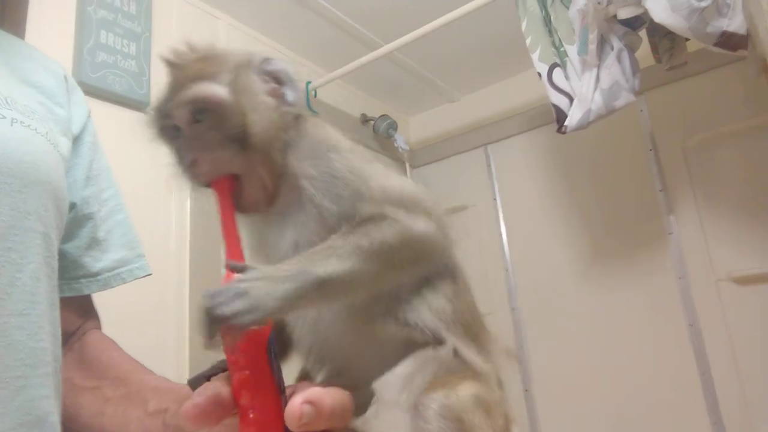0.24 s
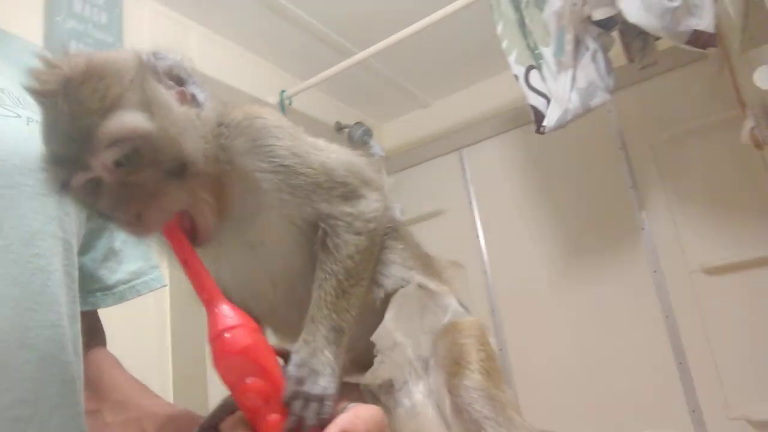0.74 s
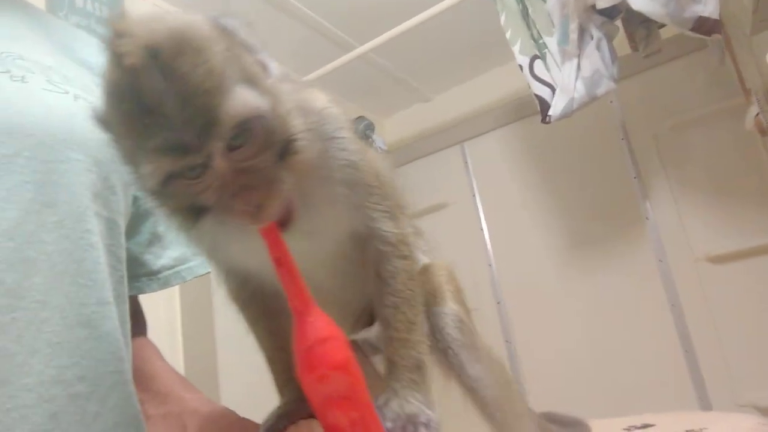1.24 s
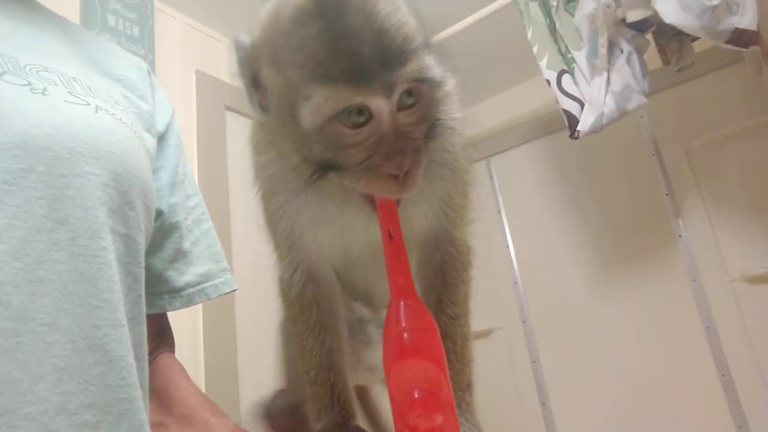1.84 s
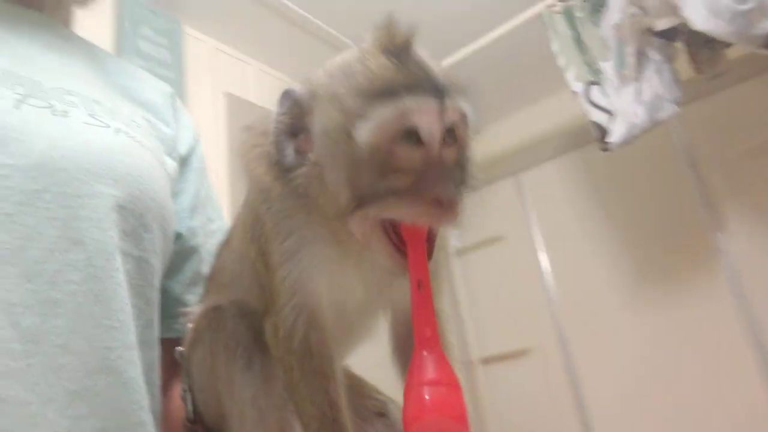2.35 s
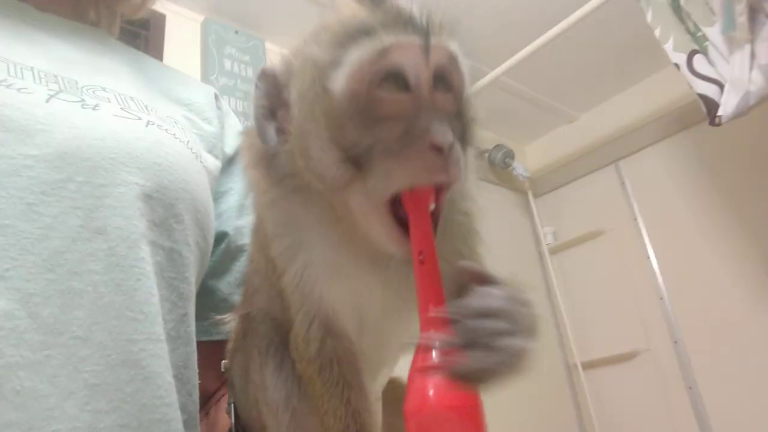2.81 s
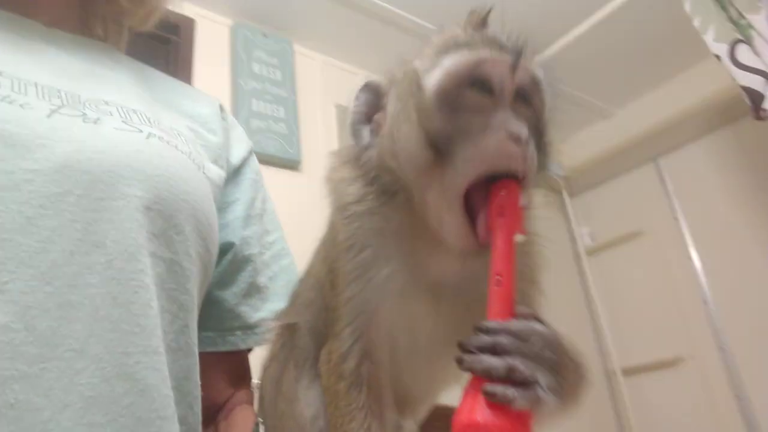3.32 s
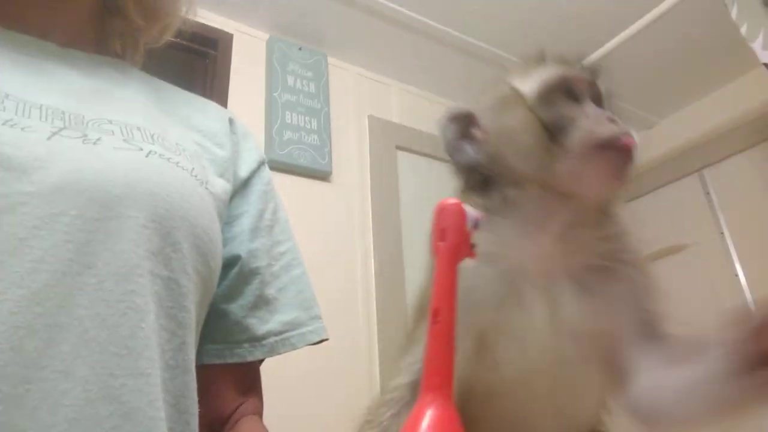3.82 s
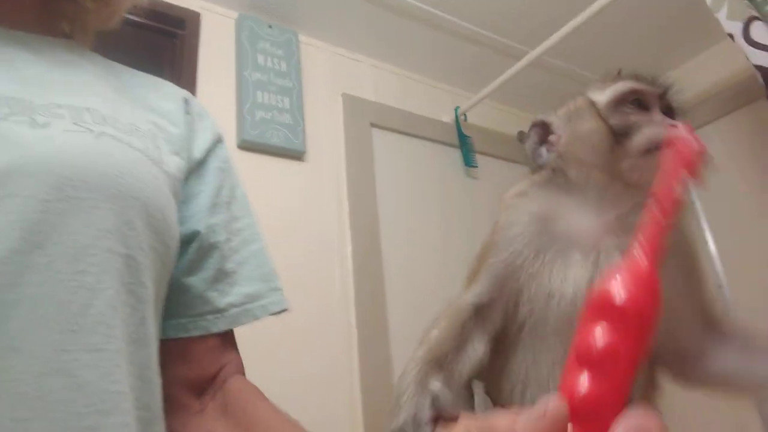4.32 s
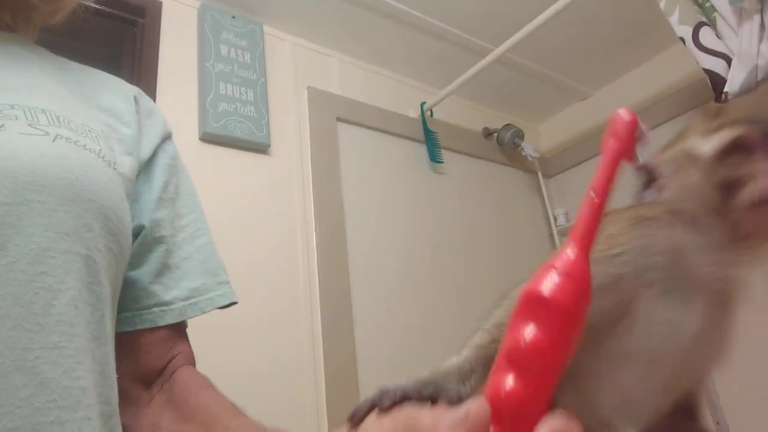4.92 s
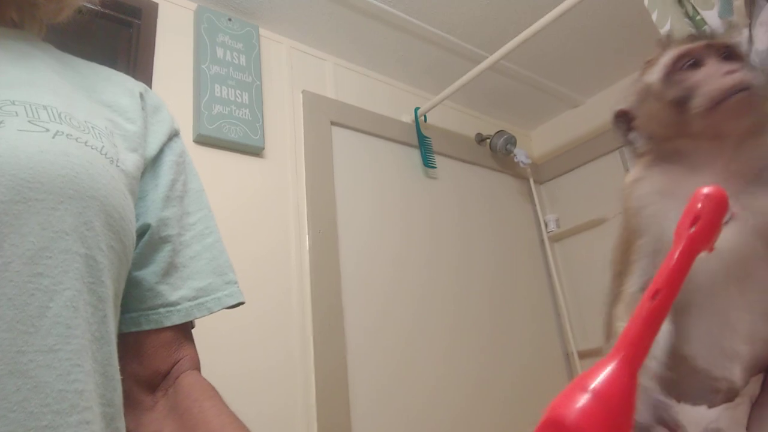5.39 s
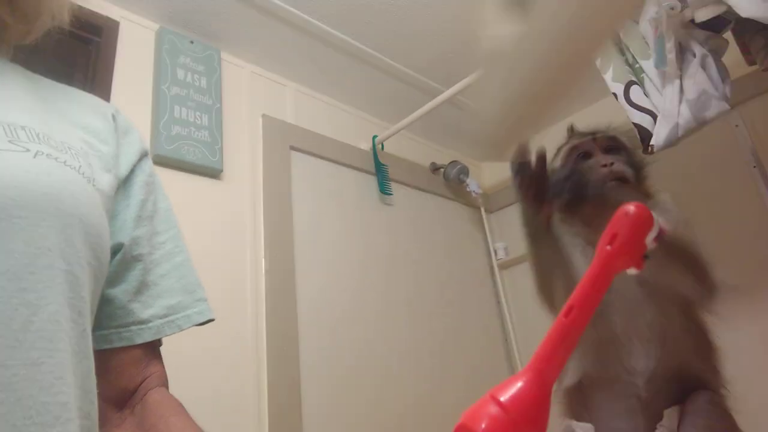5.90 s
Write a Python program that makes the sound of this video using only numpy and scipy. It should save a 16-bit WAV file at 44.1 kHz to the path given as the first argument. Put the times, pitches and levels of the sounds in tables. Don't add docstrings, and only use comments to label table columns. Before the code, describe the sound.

An electric toothbrush buzzes close by in a small tiled bathroom, its pitch sagging as a monkey bites it, then running free amid sharp clacks and knocks.

```python
import sys
import numpy as np
from scipy import signal
from scipy.fft import rfft, irfft
from scipy.io import wavfile
from scipy.ndimage import uniform_filter1d

SR = 44100
rng = np.random.default_rng(int(sys.argv[2]) if len(sys.argv) > 2 else 0)


def persist_wave(psi):
    counts = np.round(np.clip(psi, -1, 1) * 32767).astype(np.int16)
    wavfile.write(sys.argv[1], SR, np.atleast_2d(counts).T)


def gain_from_decibels(decibels):
    exponent = np.asarray(decibels, float) / 20
    return 10 ** exponent


N = 271215
T = np.arange(N) / SR

# start_s, speed_turns_per_s
MOTOR_SPEED = [(0, 81.8), (.17, 83.2), (.25, 82.3), (.44, 83.6), (.51, 80.7), (.6, 78.5), (.68, 80.8),
               (.74, 81.8), (.78, 81.5), (.92, 85.3), (.95, 84.3), (1.05, 78.6), (1.09, 71.8), (1.14, 67.4),
               (1.2, 65.6), (1.26, 64.8), (1.51, 67.5), (1.68, 67.4), (1.77, 65.4), (1.86, 69.4),
               (1.91, 75.2), (1.98, 78.8), (2.07, 82.1), (2.27, 82.6), (2.36, 78.1), (2.44, 72.7),
               (2.56, 68.1), (2.62, 70.6), (2.7, 77.1), (2.78, 81.8), (2.85, 83.3), (2.89, 83.1),
               (2.93, 85.2), (2.97, 85.2), (3.09, 81.3), (3.19, 80.8), (3.24, 78.7), (3.35, 81),
               (3.43, 81.7), (3.47, 83.6)]
# start_s, out_place_turns, back_place_turns, back_level_db, back_thud_db
CRANK_STROKES = [(0, .72, .05, 2, -3), (.3, .72, .03, 2, -3), (.42, .68, .2, 3, -1), (.5, .7, .27, 4, 0),
                 (.68, .7, .24, 4, 0), (.71, .72, .08, 2, -4), (.8, .72, .1, 0, -3), (.9, .72, .2, 0, 0),
                 (1.1, .75, .22, 2, -2), (1.3, .82, .28, 6, -1), (1.6, .87, .28, 7, 0),
                 (1.65, .87, .32, 2, -2), (1.88, .88, .36, 3, 0), (1.95, .9, .25, 3, 0),
                 (2.2, .9, .28, 4, 0), (2.27, .92, .37, 8, 0), (2.6, .85, .42, 8, 0),
                 (2.67, .81, .45, -1, 0), (2.78, .78, .47, -8, 2), (3.0, .77, .3, -12, 0),
                 (3.08, .62, .1, -3, -3), (3.2, .58, .08, -5, -2), (3.45, .57, .02, -8, 0),
                 (3.6, .56, .04, -12, 10), (3.7, .58, -.06, -14, 15), (4.1, .6, -.04, -14, 14),
                 (4.3, .56, -.05, -13, 7), (4.8, .55, -.05, -13, 6), (5.0, .58, -.05, -14, 5),
                 (5.7, .56, -.09, -11, 5), (5.85, .55, -.12, -10, 10), (6.15, .55, -.12, -10, 10)]
# multiple_of_turn, level_db
HUM_PARTIALS = [(1, -25.5), (2, -20), (3, -1), (4, -11.5), (5, -11.5), (6, -21)]
# pitch_hz, width_hz, bitten_level_db, free_level_db
HANDLE_RINGS = [(736, 256, -0.5, -5), (948, 290, -2, -2.5), (1162, 227, 5, 4.5), (1390, 334, -1, 1)]
NECK_RINGS = [(1900, 282, 0.97, -2), (2192, 1060, 1.7, -1), (2860, 1840, -0.1, -2), (3560, 123, 2, -6.5)]
HEAD_RINGS = [(4073, 270, 1.5, -3), (4958, 406, 2.5, 1.5), (5660, 1020, 1.5, -3), (6900, 810, 0, -5),
              (7740, 1350, -5.5, -10)]
PLATE_RINGS = [(8090, 2200, 7.1, 3), (9400, 4100, 3.9, 2.9), (12900, 3600, 3.3, 3.1), (14560, 440, 12, 23),
               (14860, 1870, 13.8, 14)]
# level_db, share_of_level_swing, share_of_mouth, share_of_paw
PART_MIX = [
    (-10, 1.57, 0.28, 0.96),
    (-1.5, 4.7, 0, 0.7),
    (0.5, 5.2, 0.1, 0.21),
    (-4.5, 6.5, 1, 0.1),
]
PART_LOOSENESS = [.17, .2, .34, .85]
PART_BACK_GAIN = [.5, .6, .75, 1.8]
# start_s, level_db, mouth_opening_db (on the plate), paw_off_handle_db
BRUSH_LEVEL = [(0, -42, -7, -6), (.5, -41, -2, -11), (.73, -40.5, -4.5, -11.5), (.88, -42, -2.5, -6),
               (.93, -41.5, -11, -10.5), (.945, -41, -3, -8), (1.0, -41, -2.5, -8.5), (1.25, -40, -3, -9.5),
               (1.8, -40, -1, -9), (2.09, -41.5, -5.5, -7), (2.25, -41, -1, -4.5), (2.33, -41, 1.5, -7),
               (2.64, -40.5, 1, -6.5), (2.74, -40.5, -2.5, -6.5), (3.05, -40.5, -0.5, -2.5),
               (3.14, -40.5, -2.5, -5), (3.6, -41, 5, -4.5), (3.76, -40.5, -0.5, -2),
               (4.85, -41.5, 2.5, -2.5), (6.15, -41, 2, 2.5)]
# peak_s, level_db, rise_s, fall_s
JAW_CHOMPS = [(.05, 1.5, 0.25, 0.12), (.62, 0.5, 0.028, 0.046), (.7, -0.8, 0.035, 0.0018),
              (.9, -1, 0.019, 0.015), (.936, 0, .02, 0.0018), (1.09, 1.5, 0.038, 0.046),
              (1.51, 0, 0.043, .08), (2.24, -1, 0.0083, 0.019), (2.45, 0.5, 0.021, 0.047),
              (2.84, 0.5, 0.019, 0.01), (3.09, -1, 0.023, 0.0025), (5.04, 0.5, 0.049, 0.062)]
# start_s, brightest_ring_hz, strength
JAW_GRIPS = [(0, 7150, 0.31), (.42, 5350, 0.48), (.72, 5320, 1.2), (.94, 5150, 1.6), (1.05, 5840, 0.29),
             (1.16, 5030, 0.15), (1.29, 4800, 0.15), (1.45, 6700, 0.59), (1.62, 4960, 0.87),
             (1.9, 5030, 0.89), (2.1, 6900, 0.24), (2.42, 6460, 0.32), (2.65, 5430, 0.72),
             (2.95, 6900, 0.76), (3.08, 7000, 0.85), (3.3, 5830, 0.47), (3.55, 5500, 0.68),
             (3.75, 5230, 0.87), (4.2, 5460, 0.84), (4.58, 5220, 1.3), (4.9, 5180, 1.8), (5.2, 5050, 1.7),
             (5.33, 5020, 1), (5.55, 4930, 0.73), (5.95, 5100, 0.93)]
# start_s, pitch_hz, strength
NECK_HOLLOW = [(0, 2340, 0.2), (.55, 2230, 0.83), (.95, 2030, 0.61), (1.08, 3320, 0.83), (1.3, 2630, 0.22),
               (1.42, 1390, 0.12), (1.52, 1350, 1), (1.62, 1400, 0.42), (1.7, 2500, 0.38),
               (2.62, 2360, 0.51), (2.79, 2040, 0.85), (3.3, 1790, 0.82), (3.75, 2040, 0.47),
               (4.3, 1900, 1), (4.81, 2070, 1), (5.05, 2390, 1), (5.57, 1390, 0.31), (5.89, 2460, 0.58),
               (6.15, 2360, 0.99)]
# start_s, pitch_hz, strength
PLATE_FACING = [(0, 7300, 0.56), (.55, 7250, 0.22), (1.1, 13000, 0.36), (1.4, 7700, 0.15),
                (2.5, 6860, 0.37), (2.8, 7800, 0.93), (3.05, 7250, 0.43), (3.12, 12400, 1.0),
                (3.35, 13400, 1), (3.6, 14200, 0.29), (4.1, 6700, 0.2), (4.5, 7300, 0.56),
                (4.95, 7540, 0.17), (5.2, 8100, 0.71), (5.4, 14700, 0.31), (5.9, 6900, .5),
                (6.15, 6800, 0.46)]
# start_s, butt_db, joint_db, collar_db
SHELL_DAMPING = [(0, -9, -6, -3), (.4, -3.5, -3, -1), (.9, -3, -5.5, -1.5), (1.3, 1, 0, -2.5),
                 (1.65, -1, 3.5, -1), (2.1, -3, 0.5, -2.5), (2.6, -5.5, 0, -1), (2.9, 2, 5, -3),
                 (3.35, 0.5, -3, 1), (3.65, -3, -10, 1), (3.9, 3.5, -5, 1), (4.2, 9.5, 2.5, 4),
                 (4.6, 1, 0, -2.5), (4.9, -1, -1, 0.5), (5.15, -2, 7, -2.5), (5.4, -16, -3, -2),
                 (5.65, -15, 0.5, -1), (6.15, -9, 1, -1)]
# pitch_hz, width_hz
DAMPED_RINGS = [
    (770, 200),
    (3600, 230),
    (5950, 1000),
]
# peak_s, level_db, rise_s, fall_s
HANDLE_PRESSES = [
    (1.42, 12, .3, 0.26),
    (1.8, -7, 0.17, 0.095),
    (2.3, 10.5, 0.18, 0.24),
    (3.15, 8, 0.42, 0.066),
    (3.32, 5, .05, 0.087),
    (3.6, 5, 0.11, 0.18),
]
# peak_s, level_db, rise_s, fall_s
CAM_SWELLS = [
    (.45, 20, 0.12, .1),
    (1.38, 7.5, 0.1, 0.11),
    (2.33, 20.5, 0.083, 0.12),
    (5.93, 8, .06, .06),
]
# start_s, peak_db, t60_s
HARD_CLACKS = [
    (4.347, -23, .04),
    (4.354, -12.5, .05),
    (4.358, -18.5, .17),
    (4.48, -27, .2),
    (4.568, -18, .2),
    (4.775, -23, .18),
]
# start_s, peak_db, pitch_hz, t60_s
OBJECT_KNOCKS = [(0.798, -41, 560, 0.048), (1.179, -38.5, 540, 0.22), (2.159, -41, 600, 0.1),
                 (2.423, -71, 1070, 0.09), (3.672, -33.5, 560, 0.12), (4.108, -32.5, 840, 0.22),
                 (4.264, -29, 845, 0.078), (4.304, -26.5, 980, 0.34), (4.353, -24, 850, 0.17),
                 (4.412, -26, 775, 0.26), (4.481, -22.5, 960, 0.33), (4.566, -19, 790, 0.33),
                 (4.693, -20.5, 1030, 0.48), (4.759, -19, 1040, 0.35), (4.799, -42, 773, 0.092),
                 (4.897, -71, 1050, 0.081), (5.226, -32, 980, 0.26), (5.248, -30, 1020, 0.13),
                 (5.493, -34.5, 1120, 0.13)]
# start_s, peak_db, pitch_hz, t60_s
PAW_THUMPS = [(0.088, -47.5, 171, 0.34), (0.489, -63, 234, 0.26), (0.706, -50, 173, 0.15),
              (0.756, -49.5, 189, 0.28), (0.803, -60, 139, 0.84), (1.249, -62, 188, 0.65),
              (1.351, -64, 193, 0.7), (2.131, -65, 256, 0.95), (2.424, -44.5, 190, 0.37),
              (2.546, -54, 150, 0.42), (2.866, -52.5, 252, 1), (3.128, -54, 264, 0.11),
              (3.406, -63, 245, 0.88), (4.248, -56, 224, 0.36), (4.312, -44.5, 223, 0.27),
              (4.37, -47, 239, 1), (4.468, -43.5, 220, 0.26), (4.561, -49, 235, 0.87),
              (4.696, -34, 222, 0.087), (4.758, -38.5, 192, 0.12), (4.799, -57, 165, 0.14),
              (4.897, -42.5, 171, 0.16), (5.109, -41.5, 139, 0.25), (5.125, -42, 141, 0.17),
              (5.143, -41, 133, 0.19), (5.229, -46, 248, 0.14), (5.478, -48, 192, 0.32),
              (5.816, -49, 97, 0.24)]
# start_s, left_minus_right_db, left_early_samples
BRUSH_PLACE = [(0, 4.5, -3.5), (.75, 3.5, 1.5), (1.25, 5.5, 1.5), (1.75, 2.5, 6.5), (2.25, 6.5, 4),
               (2.75, 4.5, 6), (3.25, 3, 4.5), (3.75, 4.5, 5), (4.25, 4, 3.5), (4.75, 6.5, 7.5),
               (5.25, 5.5, 6), (6.15, 4.5, 4.5)]
# pitch_hz, left_minus_right_db
SIDE_TONE = [(60, 15), (110, -11), (200, 9), (380, 3), (700, -3), (1290, -6.5), (2380, -6.5), (4400, -5),
             (8120, -5.5), (15000, -8)]
REVERB_DB = [-3, -3.5]
# pitch_hz, level_db_per_hz
RUMBLE_TONE = [(30, -30), (118, -10.5), (244, 1), (301, -4), (490, -14), (700, -10), (910, -53),
               (1540, -120)]

LET_GO_S, FREE_TURNS_PER_S = 3.62, 86.0
MEAN_DB = -41


def brush():
    speed, load, jaws = motor()
    out_at, back_at, back_db, thud_db = in_time(CRANK_STROKES)
    bite = .48 + .22 * load - .07 * np.maximum(-8 - back_db, 0)
    bite = jaws * bite + (1 - jaws) * .11
    turns = np.cumsum(speed) / SR + 2 + .0027 * speed
    forth = knock_train(turns - out_at, speed, bite, 13.0)
    back = knock_train(turns - back_at, speed, bite, 15.0)

    heard_db, mouth_db, paw_db = in_time(BRUSH_LEVEL)
    swing_db = heard_db + humps(JAW_CHOMPS) - MEAN_DB
    held = np.clip(2.5 * bite - .25, 0, 1)
    shell = np.zeros(N)
    parts = [HANDLE_RINGS, NECK_RINGS, HEAD_RINGS, PLATE_RINGS]
    thud_shares = [1.0, 0.83, 0.66, 0.54]
    for rings, mix, loose, gain, thud in zip(parts, PART_MIX, PART_LOOSENESS, PART_BACK_GAIN, thud_shares):
        same, new = forth + gain_from_decibels(back_db + gain * np.maximum(back_db, 0) + thud * thud_db) * back
        fresh = np.clip(loose * (.2 + bite), 0, 1)
        rung = ring_part(np.sqrt(1 - fresh) * same + np.sqrt(fresh) * new, rings, held)
        db, swing, mouth, paw = mix
        level_db = MEAN_DB + db + swing * swing_db + mouth * mouth_db + paw * paw_db
        shell += gain_from_decibels(level_db + 3.5) * rung / np.sqrt(uniform_filter1d(rung ** 2, size=4400) + 1e-20)
    return grip_colour(shell, held), motor_hum(turns)


def motor():
    speed, = in_time(MOTOR_SPEED + [(LET_GO_S, FREE_TURNS_PER_S)])
    speed = speed + .62 * np.maximum(T - LET_GO_S, 0)
    load = (FREE_TURNS_PER_S - speed) / (FREE_TURNS_PER_S - 66)
    jaws = np.clip((LET_GO_S - T) / .22 + .5, 0, 1)
    wobble = 1 + .001 * jaws * drift(24.0)
    return uniform_filter1d(speed, size=1100) * wobble, load, jaws


def knock_train(turns, speed, bite, spread):
    turn = np.floor(turns).astype(int)
    late, strong = rng.standard_normal((700, 2))[turn % 700].T
    since = np.maximum((turns - turn) / speed - (4e-5 * bite + 4e-6) * late, 0)
    uneven = np.interp(np.arange(513), np.linspace(0, 512, 24), rng.standard_normal(24))
    delay = 110 + spread * uneven
    smeared = irfft(np.exp(-2j * np.pi * np.cumsum(delay) / 1024), 8192) * 8
    rattle = signal.resample(rng.standard_normal((2, 1024)), 8192, axis=1)
    knock, a, b = [np.interp(since * SR * 8, np.arange(8192), p) for p in (smeared, *rattle)]
    after = np.maximum(since - 2e-3, 0) / (5.5e-4 * (1 + 2.6 * bite))
    swell = 1.6 * (1 - np.exp(-6 * after)) * np.exp(-.4 * after - (after / 2.3) ** 4) + .02
    wander = drift(2.506)
    gears = (.035 + .06 * bite) * swell * (a * np.cos(wander) + b * np.sin(wander))
    size = gain_from_decibels((.1 + .6 * bite) * strong)
    return size * np.array([knock + gears, 0.11 * swell * rng.standard_normal(N)])


def ring_part(blows, rings, held):
    rung = np.zeros(N)
    for k, (hz, width_hz, bitten_db, free_db) in enumerate(rings):
        level = gain_from_decibels(held * bitten_db + (1 - held) * free_db + 1.05 * drift(3.124))
        rung += (-1) ** k * level * resonate(blows, hz, width_hz)
    low_hz, high_hz = rings[0][0], rings[-1][0]
    return resonate(rung, np.sqrt(low_hz * high_hz), 1.6 * (high_hz - low_hz))


def grip_colour(shell, held):
    grip_hz, grip = held_steps(JAW_GRIPS)
    hollow_hz, hollow = in_time(NECK_HOLLOW)
    facing_hz, facing = in_time(PLATE_FACING)
    shell = (shell + grip * cavity(shell, grip_hz, 910) + hollow * cavity(shell, hollow_hz, 1030)
             + facing * cavity(shell, facing_hz, 1200))
    for db, (hz, width_hz) in zip(in_time(SHELL_DAMPING), DAMPED_RINGS):
        shell += (gain_from_decibels(db) - 1) * resonate(shell, hz, width_hz)
    shell -= .35 * (1 - held) * resonate(shell, 10100, 700)
    thin_stick = signal.butter(4, 700, "high", fs=SR, output="sos")
    return signal.sosfilt(thin_stick, shell)


def motor_hum(turns):
    hum = np.zeros(N)
    for k, db in HUM_PARTIALS:
        level_db = db + 4 * drift(9.1) + (k == 2) * humps(CAM_SWELLS)
        hum += gain_from_decibels(level_db) * np.sin(2 * np.pi * k * turns)
    lifted = np.clip((T - 4.7) / .15 + .5, 0, 1)
    return gain_from_decibels(-74.5 - lifted + humps(HANDLE_PRESSES)) * hum


def other_face(x):
    share = .6
    top = signal.butter(4, 5800, "high", fs=SR, output="sos")
    treble = signal.sosfiltfilt(top, x)
    slow = signal.butter(4, 600, fs=SR, output="sos")
    flutter = rms_one(signal.sosfilt(slow, rng.standard_normal(N)))
    return x + (np.sqrt(1 - share) - 1) * treble + np.sqrt(share) * signal.sosfilt(top, treble * flutter)


def clacks():
    hits = np.zeros(N)
    for s, db, t60 in HARD_CLACKS:
        add(hits, s, blow(t60, 0.0003), db)
    return resonate(hits, 2000, 3300) + 0.72 * resonate(hits, 4000, 13000)


def paws():
    out = np.zeros(N)
    for s, db, hz, t60 in PAW_THUMPS:
        shake = resonate(blow(t60, 0.00027), 115, 146)
        add(out, s, resonate(shake, hz, 40) + 0.095 * resonate(shake, 134, 66) + 0.12 * shake, db)
        boom = resonate(resonate(blow(2.5 * t60, 0.049), 99, 170), 99, 170)
        add(out, s, boom, db - 16.0)
    for s, db, hz, t60 in OBJECT_KNOCKS:
        shake = resonate(resonate(blow(.75 * t60, 0.0013), 540, 1600), 560, 1650)
        add(out, s, resonate(shake, hz, 87) + 2.9 * shake, db - 8.5)
    return out + scuffle()


def scuffle():
    drag = rms_one(resonate(rng.standard_normal(N), 470, 1200))
    fur = rms_one(resonate(resonate(rng.standard_normal(N), 120, 250), 130, 270))
    drag_level = peak_at(4.35, -51, 0.1, 0.3) + peak_at(5.25, -55, 0.04, 0.05)
    return drag * drag_level + fur * peak_at(6.0, -63, .2, .5)


def bathroom(x):
    t = T[:SR // 4]
    decay = gain_from_decibels(-60 * t / .15) + 5 * gain_from_decibels(-60 * t / .012)
    tails = rng.standard_normal((2, 2, len(t))) * decay * (t > .0008)
    tails = signal.lfilter([1, -1], [1, -.85], tails)
    tails = gain_from_decibels(REVERB_DB)[:, None] * tails / np.sqrt(np.sum(tails ** 2, axis=2, keepdims=True))
    moved = drift(2.2)
    return sum(signal.fftconvolve(tail, (x * share)[None], axes=1)[:, :N]
               for tail, share in zip(tails, (np.cos(moved), np.sin(moved))))


def rumble():
    return gain_from_decibels(-77) * rms_one(shade(rng.standard_normal(N), RUMBLE_TONE))


def rms_one(x):
    return x / np.sqrt(np.mean(x ** 2) + 1e-20)


def in_time(rows):
    s, *columns = np.transpose(rows)
    return [np.interp(T, s, c) for c in columns]


def held_steps(rows):
    s, *columns = np.transpose(rows)
    now = np.searchsorted(s, T, side="right") - 1
    return [uniform_filter1d(c[now], int(0.047 * SR), mode="nearest") for c in columns]


def humps(rows):
    return sum(db * np.exp(-.5 * ((T - s) / np.where(T < s, rise, fall)) ** 2) for s, db, rise, fall in rows)


def peak_at(s, db, rise_s, fall_s):
    return gain_from_decibels(db) * np.clip((T - s) / rise_s + 1, 0, 1) * np.exp(-np.maximum(T - s, 0) / fall_s)


def drift(rate):
    knots = rng.standard_normal(200)
    return uniform_filter1d(np.interp(T * rate, np.arange(200), knots), size=2000)


def blow(t60, rise_s):
    since = T[:SR]
    return (1 - np.exp(-since / rise_s)) * gain_from_decibels(-60 * since / t60) * rng.standard_normal(SR)


def add(out, s, x, db):
    at = round(s * SR)
    out[at:at + len(x)] += gain_from_decibels(db) * x[:N - at] / np.abs(x).max()


def resonate(x, hz, width_hz):
    r = np.exp(-np.pi * width_hz / SR)
    poles = [1, -2 * r * np.cos(2 * np.pi * hz / SR), r * r]
    return signal.lfilter([(1 - r * r) / 2, 0, (r * r - 1) / 2], poles, x)


def cavity(x, hz, width_hz):
    carrier = np.exp(2j * np.pi * np.cumsum(hz) / SR)
    r = np.exp(-np.pi * width_hz / SR)
    return 2 * np.real(carrier * signal.lfilter([(1 - r) ** 2], [1, -2 * r, r * r], x / carrier))


def shade(x, points, share=1):
    hz, db = np.transpose(points)
    at = np.log(np.arange(N // 2 + 1) * SR / N + 1)
    return irfft(rfft(x) * gain_from_decibels(share * np.interp(at, np.log(hz + 1), db)), N)


def scene():
    shell, hum = brush()
    bright = shell + clacks()
    pan_db, early = in_time(BRUSH_PLACE)
    left = np.interp(np.arange(N) + np.round(early), np.arange(N), bright)
    left, right = np.array([gain_from_decibels(-8) * left, bright]) + bathroom(bright)
    left = gain_from_decibels(pan_db + 2.5) * shade(other_face(left), SIDE_TONE, share=0.96)
    right = shade(right, SIDE_TONE, share=-0.43)
    low = paws() + hum + rumble()
    wide = .5 * rumble() + 0.44 * np.roll(low, 300) + 0.11 * low
    return np.array([left + low + wide, right + low - wide])


def roll_off(x):
    return signal.sosfilt(signal.butter(12, 15830, fs=SR, output="sos"), x)


def record(dry):
    treble_limit = signal.cheby2(12, 60, 16280, fs=SR, output="sos")
    low_cut = signal.butter(3, 55, "high", fs=SR, output="sos")
    mix = signal.sosfilt(low_cut, signal.sosfilt(treble_limit, dry))
    return roll_off(mix)


dry = scene()
out = record(dry)
persist_wave(out)
```